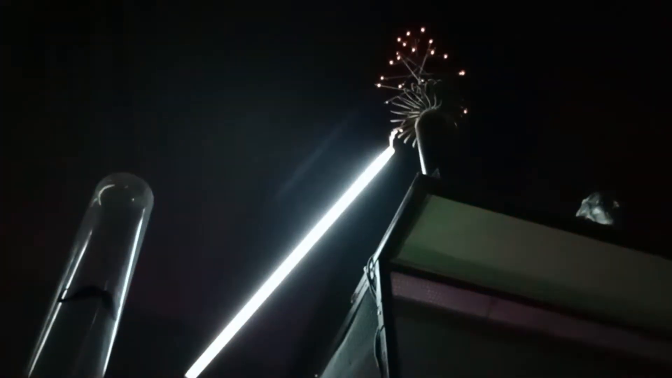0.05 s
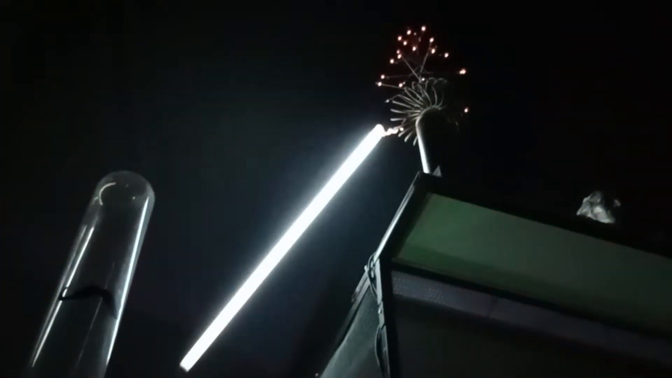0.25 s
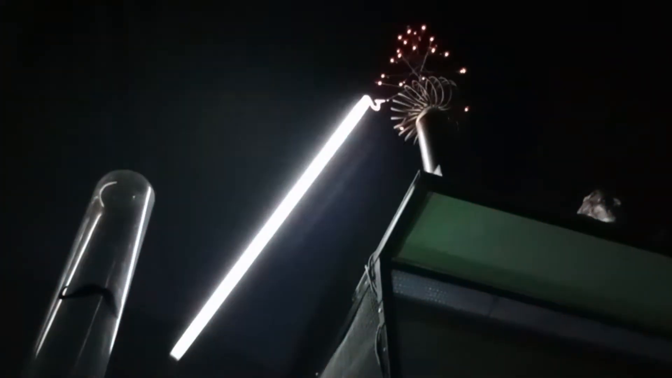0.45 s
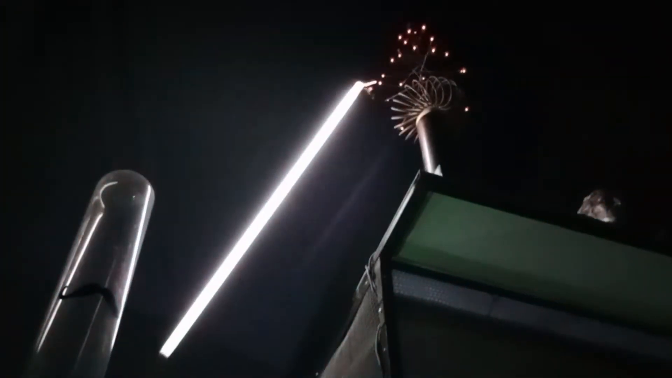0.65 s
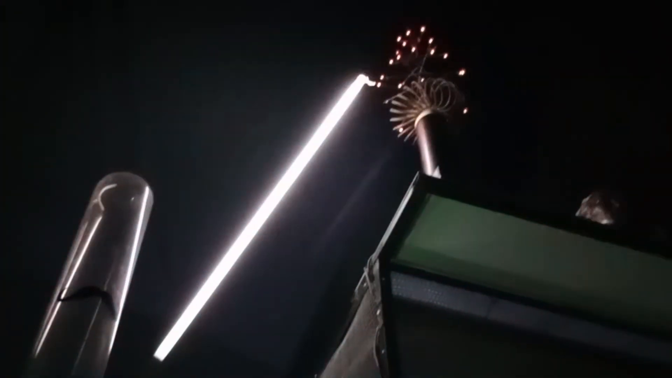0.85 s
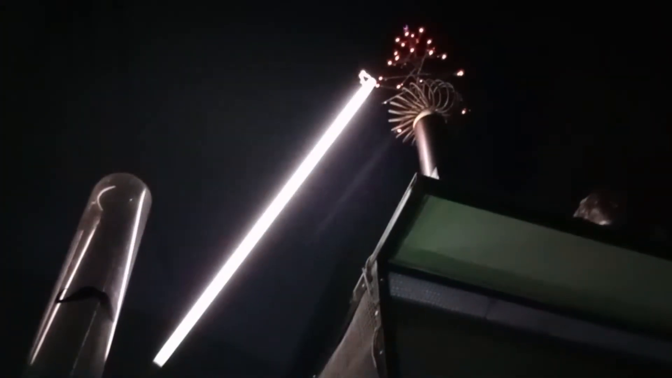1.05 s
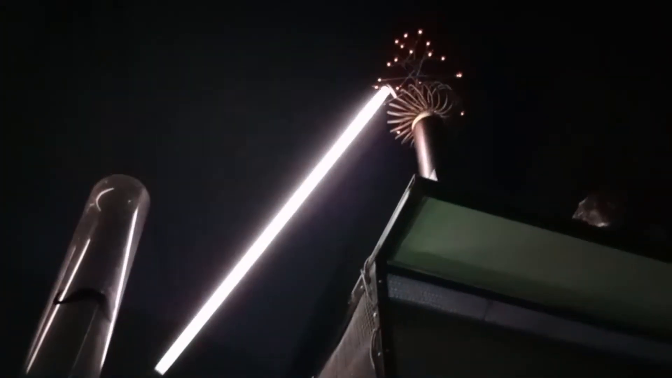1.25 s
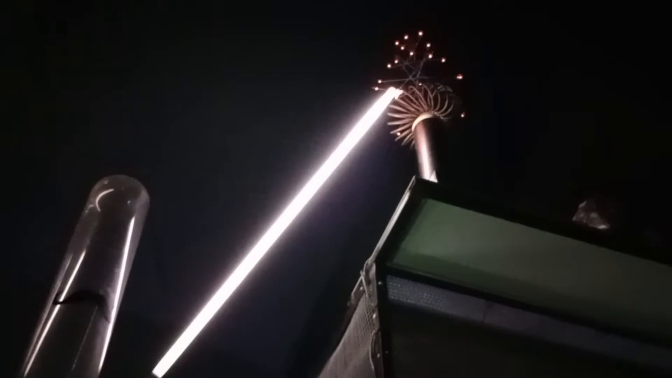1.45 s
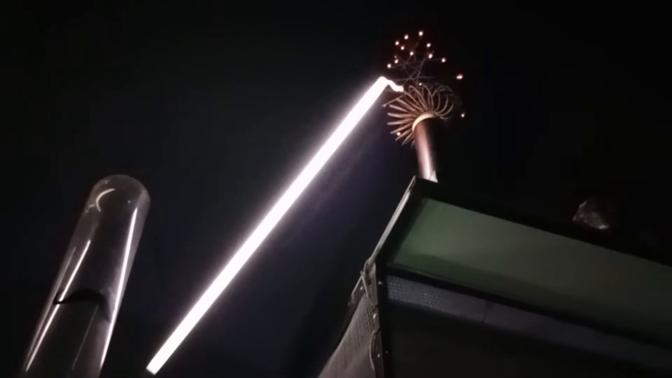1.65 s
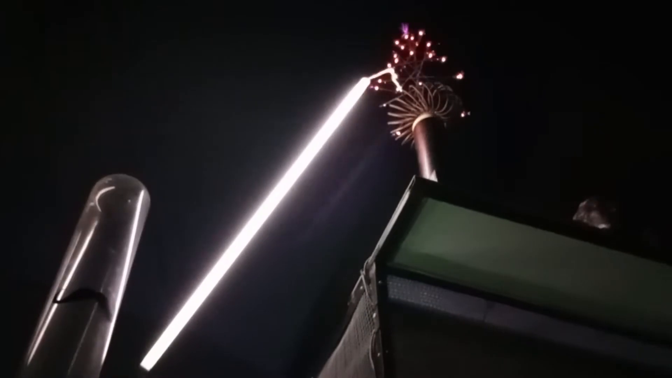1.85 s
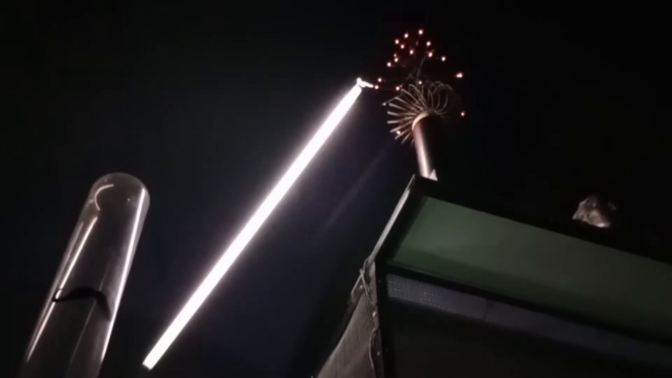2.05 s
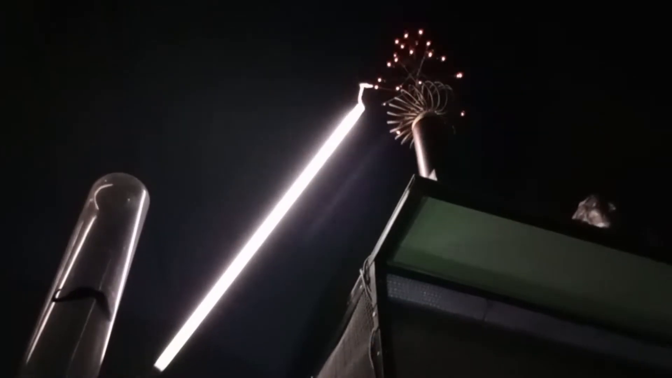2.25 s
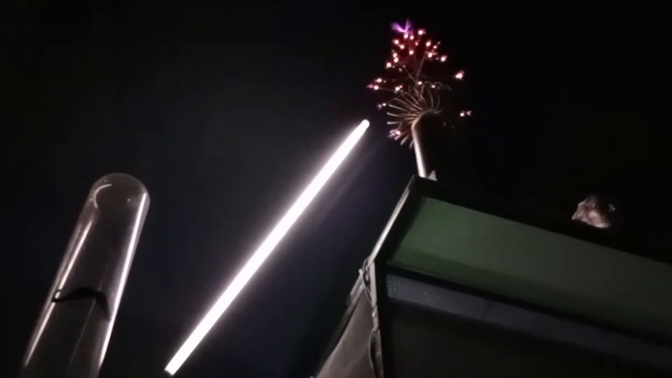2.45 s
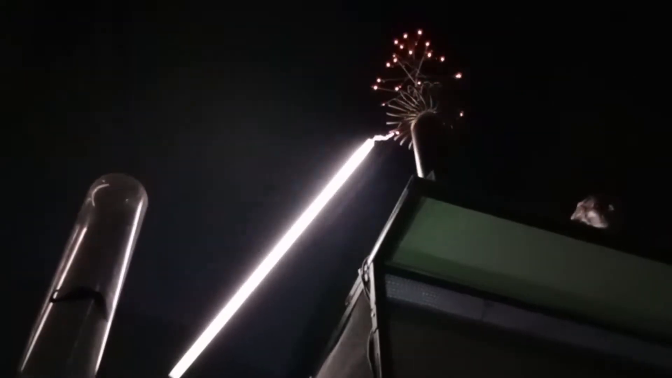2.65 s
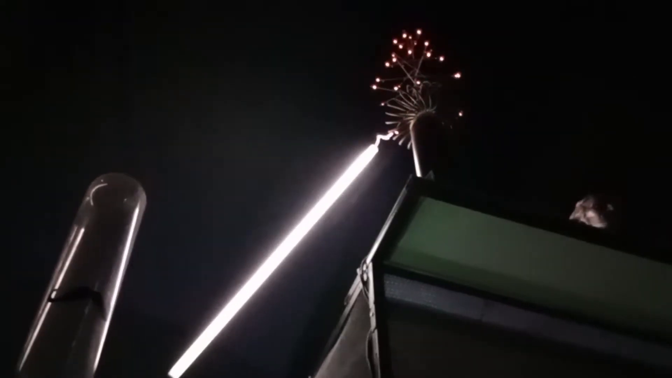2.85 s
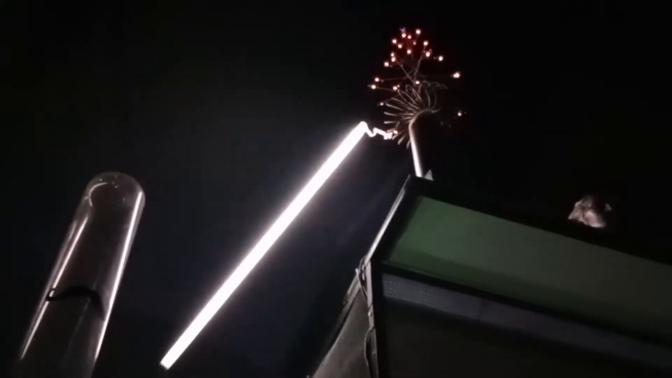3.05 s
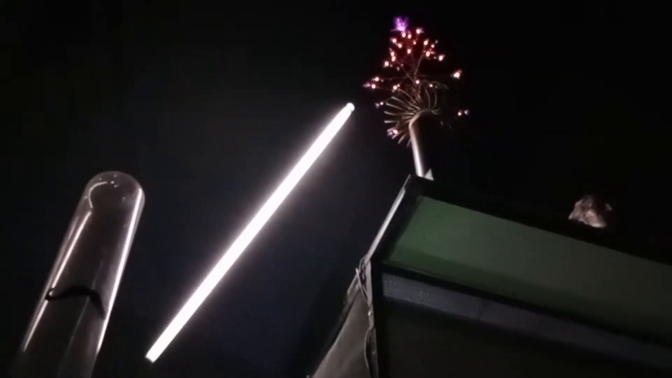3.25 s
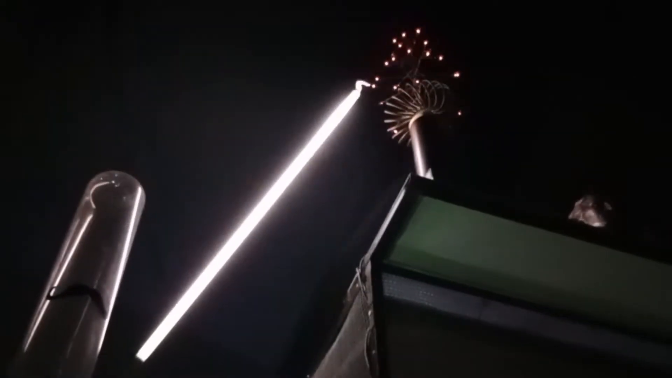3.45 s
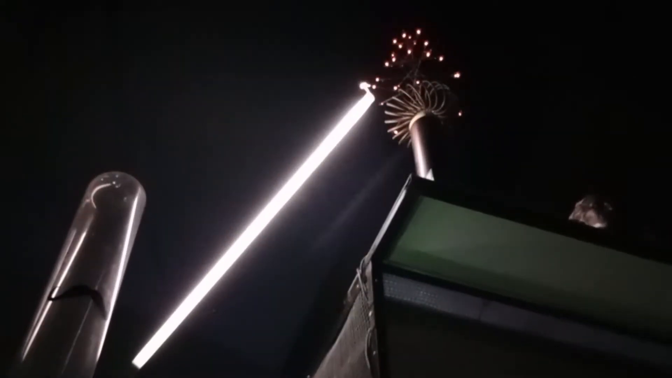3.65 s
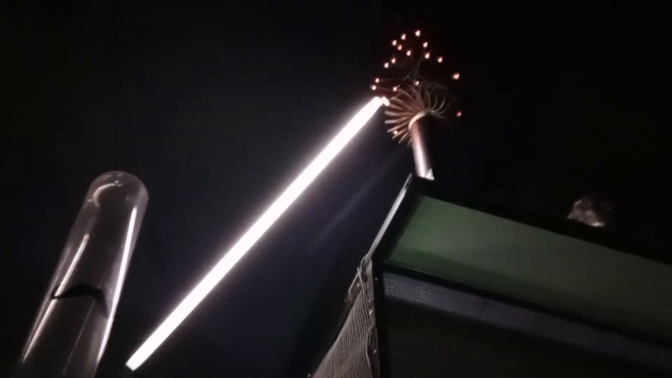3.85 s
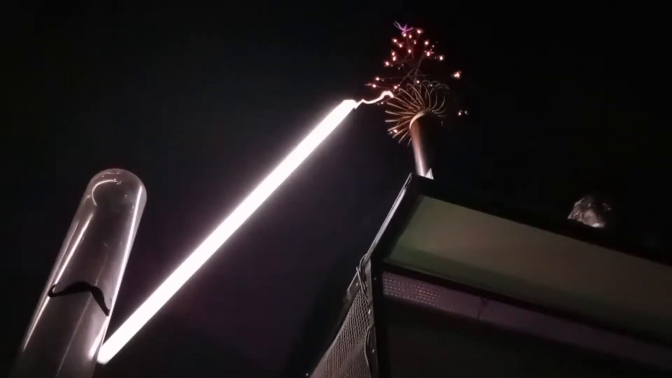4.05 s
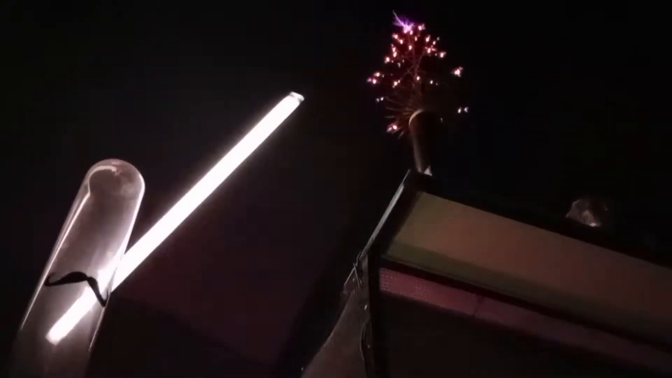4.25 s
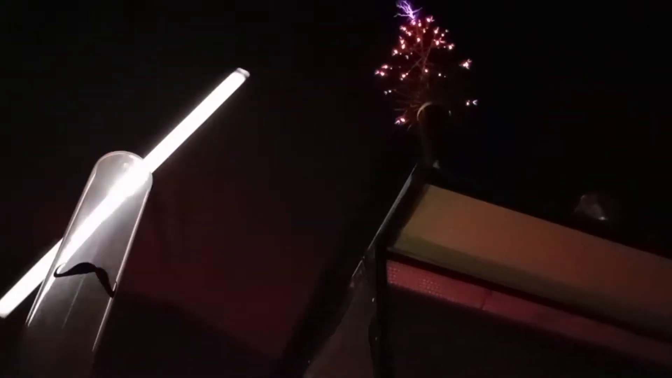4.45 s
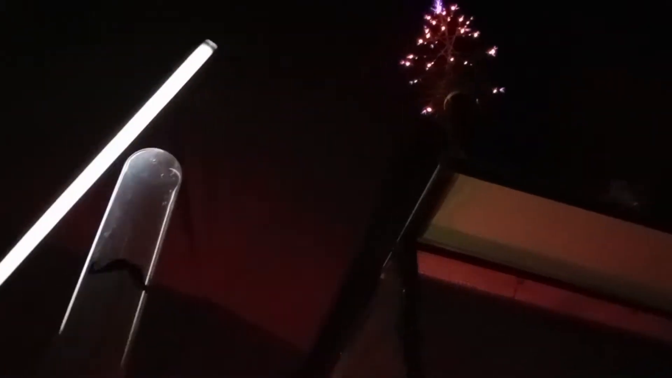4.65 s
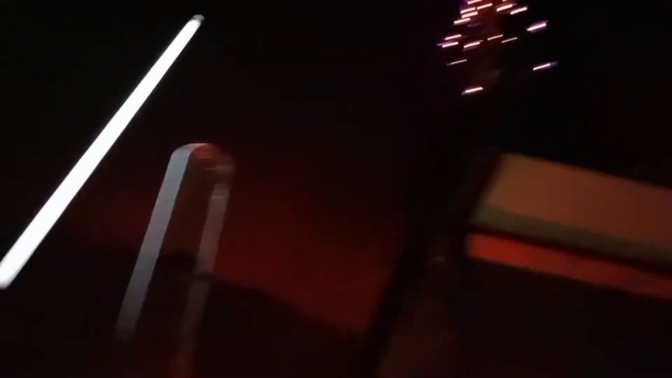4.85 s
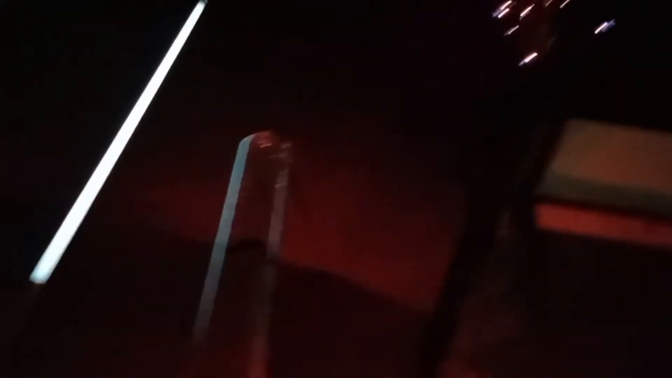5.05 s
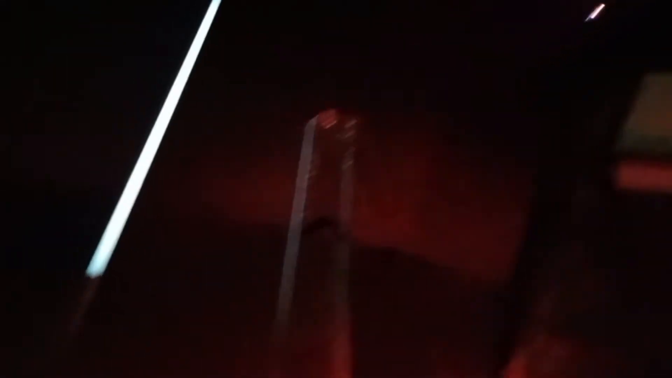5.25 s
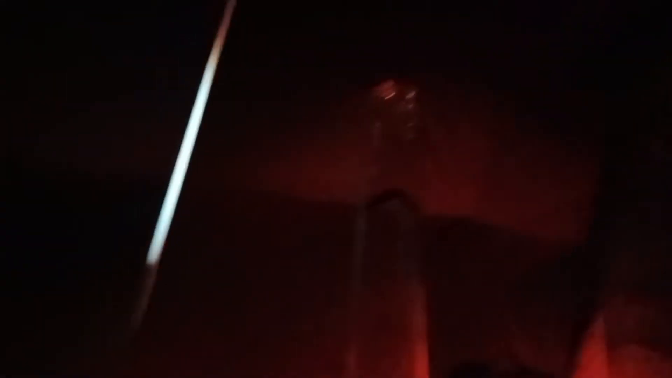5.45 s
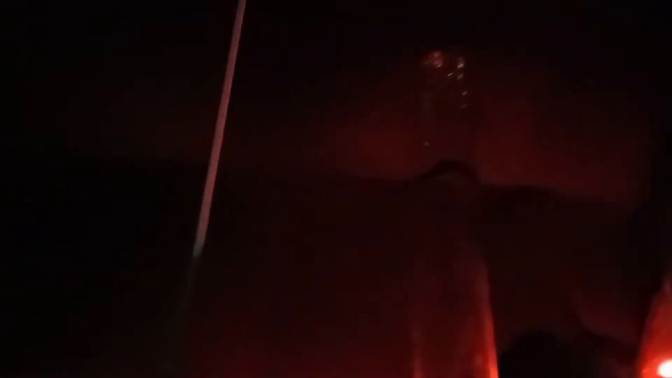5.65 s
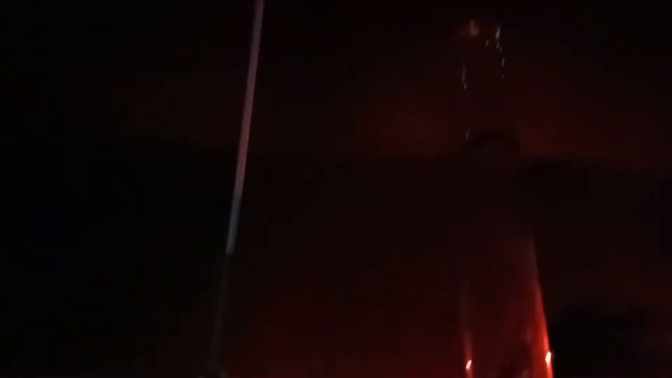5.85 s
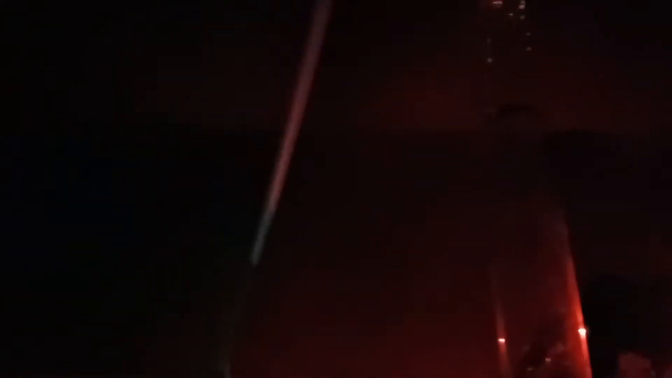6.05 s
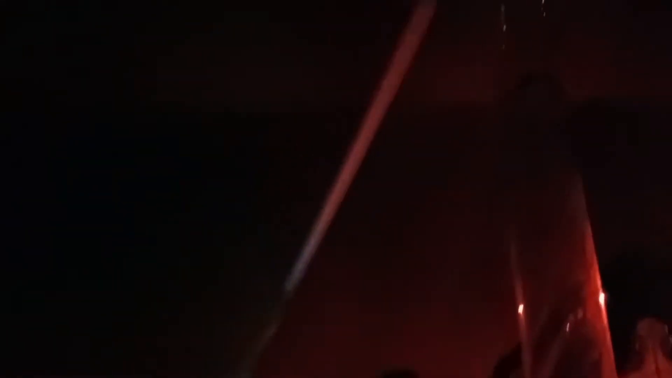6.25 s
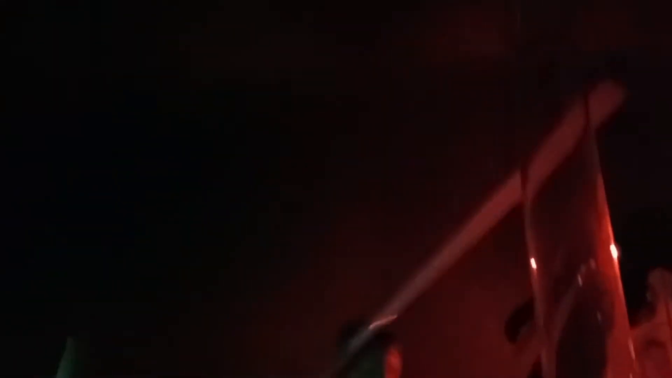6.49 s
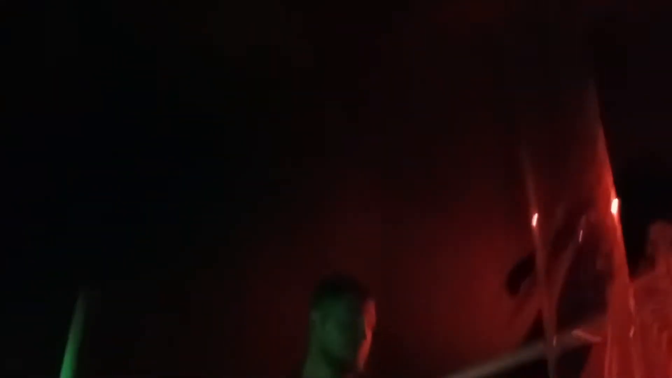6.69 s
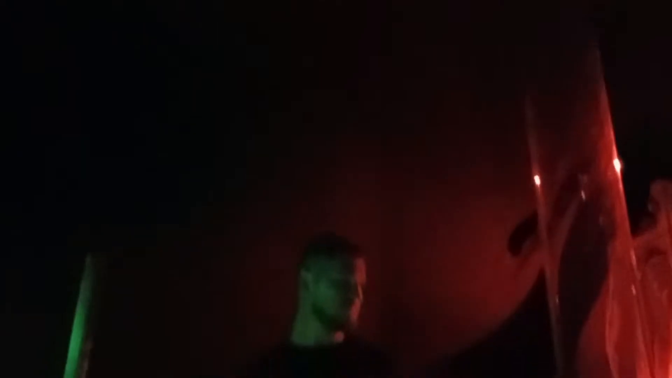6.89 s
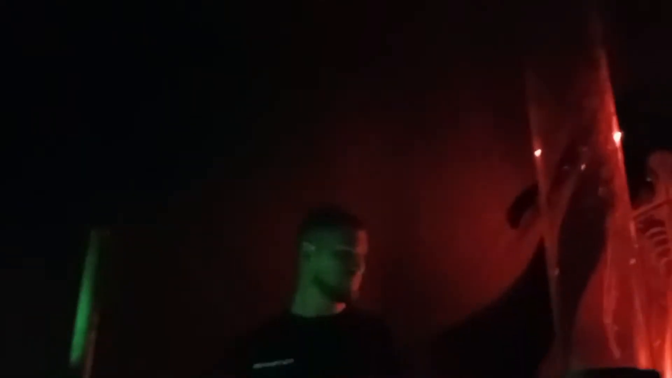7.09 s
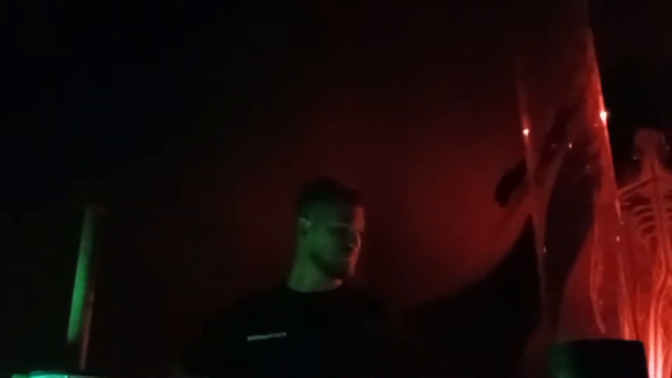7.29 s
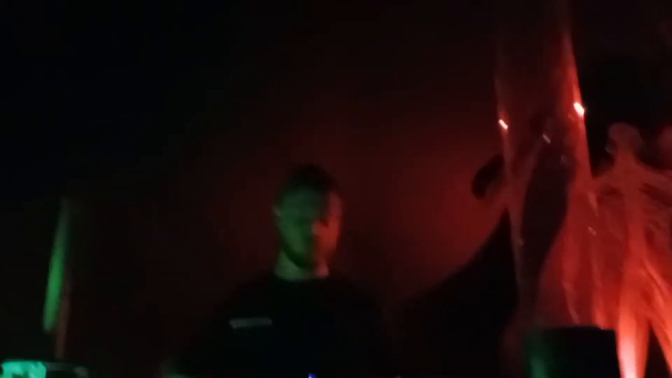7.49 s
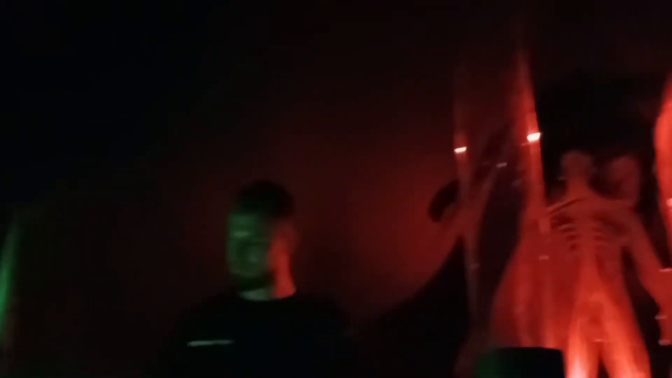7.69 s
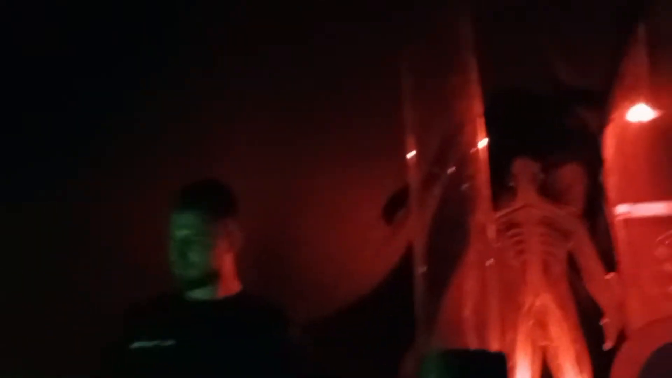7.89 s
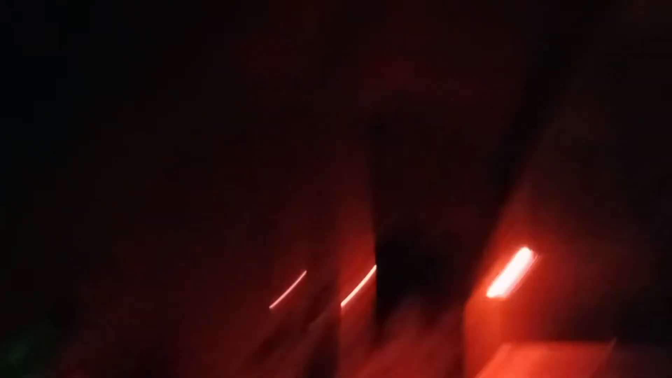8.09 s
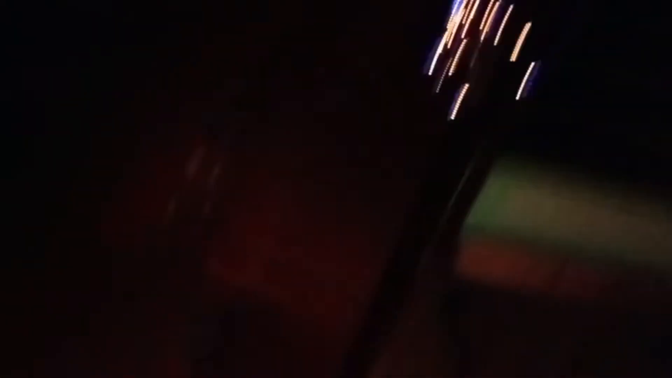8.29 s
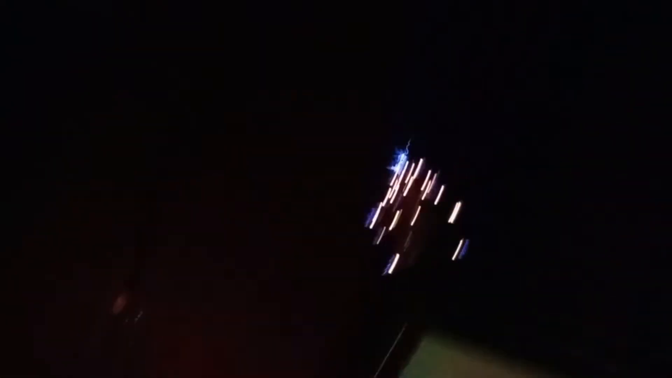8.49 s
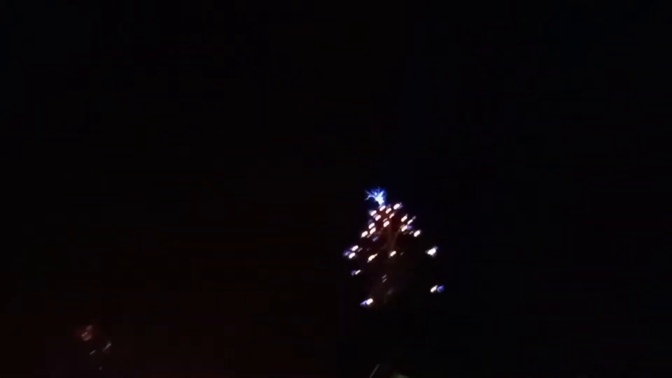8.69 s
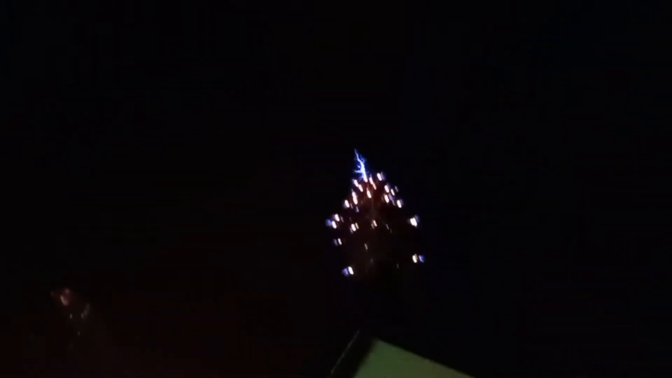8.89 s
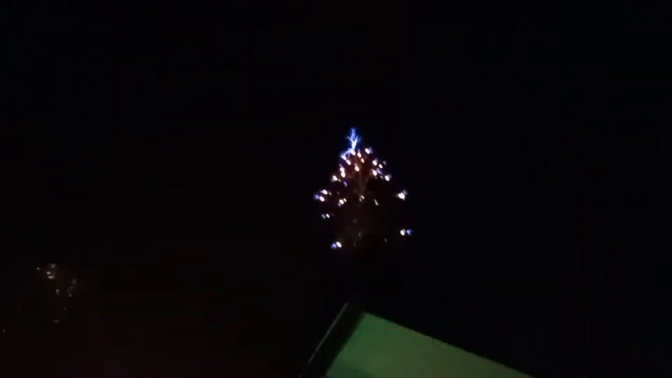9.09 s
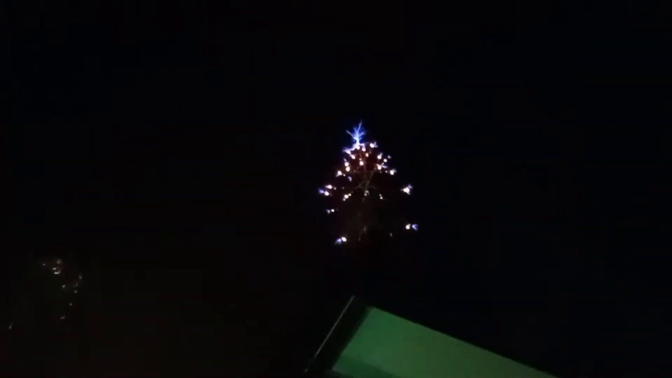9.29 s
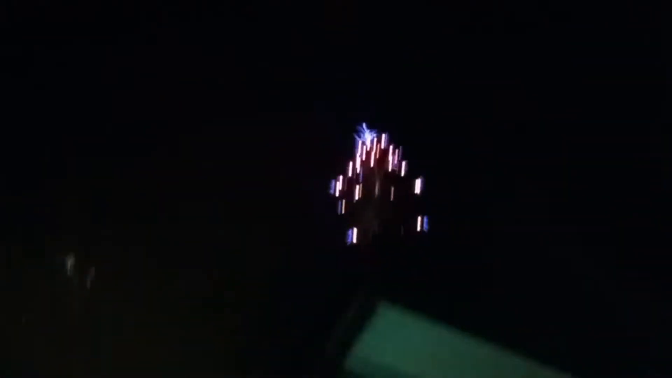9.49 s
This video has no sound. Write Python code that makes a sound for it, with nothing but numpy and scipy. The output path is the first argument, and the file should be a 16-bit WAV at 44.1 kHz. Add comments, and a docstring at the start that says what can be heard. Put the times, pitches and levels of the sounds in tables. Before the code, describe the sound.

A high-voltage coil buzzes loudly and continuously at one fixed pitch, harsh and metallic, its tone flickering as sparks jump between sharp arc and fizzing corona.

```python
"""In a hall, an interrupted high-voltage coil fires a spark about 472 times a second, close to a hand-held microphone.
The discharge jumps between a sharp arc to a glowing tube and a fizzing corona on the coil's tip. Summed overtones
make the buzz, pulsed noise the fizz; echoes from three near surfaces lift and sink the low overtones as spark and
listener move. Handling adds low rumble, brief hums and two knocks."""
import sys
import numpy as np
from scipy import signal
from scipy.fft import rfft, irfft, next_fast_len
from scipy.io import wavfile

SR = 44100
rng = np.random.default_rng(int(sys.argv[2]) if len(sys.argv) > 2 else 0)


def to_wav(s):
    """Save 16-bit WAV."""
    ch = np.atleast_2d(s).T  # columns
    pcm = np.round(np.clip(ch, -1, 1) * 32767)  # PCM
    wavfile.write(sys.argv[1], SR, pcm.astype(np.int16))


N = 420273
STEP = 32   # samples between two control values
SPARK_HZ = 471.93
SOUND_CM_PER_S = 34300

# Where the discharge lands. Each row: start in seconds, how far it jumps (0-1), 1 for an arc on the tube or 0 for
# corona, buzz in dB, growth in dB per s, crackle in dB, fizz in dB, then the extra path of three echoes in cm,
# counted within one wavelength of the spark rate.
JUMPS = [(0.0, 0.9, 1.0, -1, -12, -15, -39, 20.7, 11, 43.6),
         (0.042, 0.38, 1.0, -5.5, 63, -13, -45.5, 51, 13.7, 44.3),
         (0.22, 0.38, 1.0, 0.6, 16, -14, -47, 58.1, 51.3, 29),
         (0.44, 0.81, 1.0, 5.6, 5, -17, -34, 17.5, 67.4, 70.7),
         (0.678, 0.74, 1.0, -1.1, 41, -18.5, -39.8, 12.2, 52, 62.5),
         (0.79, 0.27, 1.0, 0.4, 47, -15.5, -44, 47.4, 19.6, 24),
         (0.89, 0.29, 1.0, 1.7, 24.8, -13.5, -43, 61.4, 17.6, 12),
         (1.02, 0.33, 1.0, 4.5, -8, -14.5, -37.4, 14.6, 66.5, 53),
         (1.234, 1.0, 1.0, -3, 14.7, -18, -41.1, 54, 24.4, 5.6),
         (1.44, 0.32, 1.0, -5.5, 43, -14, -47, 50, 34.6, 66.5),
         (1.61, 0.29, 1.0, -3, 41, -14.5, -45, 31, 51, 53.5),
         (1.888, 0.55, 0.0, -0.2, 13, -19.5, -34.0, 39, 63, 53),
         (2.022, 0.96, 1.0, -3.5, 27.5, -17, -38, 65, 54.3, 16),
         (2.15, 0.27, 1.0, -2.7, 68, -15, -46, 18.8, 44, 46.5),
         (2.25, 0.3, 1.0, -0.2, 0.2, -18, -41, 55, 1.75, 12.2),
         (2.417, 0.74, 0.0, -7.5, 60, -20.5, -33, 62.9, 28.8, 18.5),
         (2.615, 0.51, 0.0, -1.7, 11, -15.5, -27.9, 27.2, 68, 8.8),
         (2.65, 0.97, 1.0, -0.4, 16, -15.5, -37, 48, 12.8, 41),
         (2.837, 0.48, 1.0, 0, 44, -13, -46, 59, 23.5, 27.3),
         (2.99, 0.299, 1.0, 2.5, -19.5, -19, -35, 72.7, 22, 27),
         (3.045, 0.89, 1.0, -2, 108, -16, -35.7, 63, 22, 32),
         (3.11, 0.38, 0.0, 0, 18.5, -19, -36.5, 32, 25.7, 59.5),
         (3.25, 0.3, 0.0, 2, -6, -16, -30, 67, 27.3, 13),
         (3.427, 0.9, 1.0, -2, 77.8, -18.5, -34, 54.8, 39.0, 37),
         (3.53, 0.3, 1.0, -2, 61.5, -17, -43, 43.7, 17.1, 25.7),
         (3.62, 0.31, 1.0, -0.8, 37, -18.5, -48, 29.4, 66.4, 39.7),
         (3.785, 0.95, 1.0, -2.5, 30, -21.2, -37, 15, 47.5, 71.6),
         (3.94, 0.3, 1.0, 1.5, -12, -15.5, -41.1, 18.8, 50.6, 60),
         (4.111, 0.64, 0.0, -3, 13, -33.5, -36.4, 47, 4.1, 60.6)]
# The listener turns away and back once the corona stays on the tip; changes added to the current jump, the first
# row also holding before its time. Each row: time in seconds, buzz in dB, 8th-11th overtones in dB, crackle in dB,
# air in dB, fizz in dB, then the extra path of the three echoes in cm.
TURN = [(4.12, 0.0, -1, -6.5, 2, -3, 0.0, -0.5, 2), (4.3, 5, 2.5, 10, -1, 6, -0.2, 0.3, -1.4),
        (4.66, 5.0, -4, 8, 0.4, 4, 3.5, 1.0, 0.4), (5.1, 4.3, -0.5, 4, 4, 5.8, -0.8, -2.5, 0.5),
        (5.5, 6.5, 2.4, 8.3, 5, 8, 1.5, 5.5, -6), (5.8, 6, 3, 8.5, 0.2, 5.5, 14, 8, -3.5),
        (6.06, 5, 3.5, 7, 6, 10, 10.5, 6.5, -5), (6.34, 4, 5, 8, 2.9, 5, 13.5, 6.5, -4.5),
        (6.56, 1.1, -1, 7, 2.5, 10.5, 19, 8.5, -6), (6.8, 3.5, -2.5, 7, -0.9, 4, 27, 10.5, -20.5),
        (7.1, 3, -1, 12, 4, 3, 25, 14, -14.5), (7.34, 4.5, 2, 12.5, 6, 9, 17.5, 16.5, -16),
        (7.54, 3, -4, 15, 1.9, 0, 14, 11.5, -14.5), (7.74, 2, 0.5, 12, 2.0, 6, 16, 11, -21.5),
        (7.92, -0.4, -1, 13, 2, 8, 13, 8, -23), (8.1, 3.5, -1, 10.5, -2, 5, 0.3, 9, -11),
        (8.3, 4.4, -5, 7.5, -4, -2, 1, 9.5, -0.3), (8.6, 5.5, -7, 9.5, -2.5, 5.5, -0.5, 10.0, 0.6),
        (9.0, 6.7, -0.5, 12, -6, 3.2, 0, 12, 0), (9.3, 6, 2.5, 7.3, -0.7, -2, -1, 10.7, 1.2),
        (9.52, 6, 4, 11.5, -8, 1.3, -1.5, 13, -1.5)]
# Gain of each of the three echoes; the third surface returns the wave upside down.
ECHO_GAINS = [0.41, 0.57, -0.48]


def amp(db):
    """dB to gain."""
    return 10 ** (np.asarray(db) / 20)


def rms_one(x):
    """Scale to rms 1."""
    return x / np.sqrt(np.mean(np.abs(x) ** 2) + 1e-20)


def in_time(rows, t):
    """Columns of a table, read at times t."""
    s, *columns = np.transpose(rows)
    return [np.interp(t, s, c) for c in columns]


def coloured(x, spectrum):
    """Filter x by a (Hz, dB) table, interpolated over log frequency; rms 1."""
    size = next_fast_len(len(x))
    hz = np.maximum(np.arange(size // 2 + 1) * SR / size, 1)
    points_hz, points_db = np.transpose(spectrum)
    gain = amp(np.interp(np.log(hz), np.log(points_hz), points_db))
    return rms_one(irfft(rfft(x, size) * gain, size)[:len(x)])


def smooth(x, rate_hz):
    """One-pole low-pass of a control signal, settled on its first value."""
    r = np.exp(-2 * np.pi * rate_hz * STEP / SR)
    return signal.lfilter([1 - r], [1, -r], x, zi=[r * x[0]])[0]


def drift(rate_hz, count):
    """Slow complex chance at the control rate; rms 1."""
    settle = 2000
    x = rng.standard_normal(count + settle) + 1j * rng.standard_normal(count + settle)
    for _ in range(3):
        x = smooth(x, rate_hz)
    return rms_one(x[settle:])


def per_sample(control):
    """Control signal read at every sample."""
    return np.interp(np.arange(N) / STEP, np.arange(len(control)), control)


def spot_at(t):
    """Index of the last jump before each time."""
    return np.searchsorted(np.array(JUMPS)[:, 0], t, side="right").clip(1) - 1


def buzz(group_db, t):
    """The overtones of the spark train, each with its own level, phase and waver."""
    # First overtone of each group; the last entry ends the last group.
    group_starts = [1, 2, 3, 4, 5, 6, 7, 8, 12, 24, 33]
    # Shape within each group, overtones 8 to 32, in dB; only differences within a group count.
    upper_db = [-33, -27, -36, -37, -38, -32, -27, -23, -34, -33, -28, -28, -35, -30, -29, -32, -42, -41,
                -37.0, -38, -41, -48, -43, -41, -43]
    overtone_db = np.r_[np.zeros(7), upper_db]
    crackle_start = group_starts[-3]
    count = len(t)
    when, far, arc = np.transpose(JUMPS)[:3]
    spot = spot_at(t)
    arc_now = arc[spot]
    # each spot has its own travel time
    path = np.cumsum(far ** 3 * rng.uniform(1, 2 * np.pi - 1, len(when)))
    turn = np.exp(2j * np.pi * SPARK_HZ * np.arange(N) / SR)
    ripple = np.sin(2 * np.pi * 100 * t)   # the supply sags twice a mains cycle
    # the channel wriggles, most while it re-forms
    unrest = 0.062 - 0.014 * arc_now + 0.2 * splutter(t)
    # the arc stretches and shrinks
    swell = amp(arc_now * drift(7.4, count).real)
    carrier, out = np.ones(N, complex), np.zeros(N)
    for level_db, first, end in zip(group_db, group_starts, group_starts[1:]):
        share = amp(overtone_db[first - 1:end - 1])
        share = share / np.linalg.norm(share)
        for k, part in zip(range(first, end), share):
            carrier = carrier * turn
            chance = rng.standard_normal(len(when))
            for j in range(1, len(when)):   # a short hop keeps most of the old pattern
                chance[j] = np.sqrt(1 - far[j] ** 2) * chance[j - 1] + far[j] * chance[j]
            # the arc keeps its overtones in step, a sharp crack; the many streamers of the corona scatter them
            scatter = np.where(arc > 0, 0.3 + 1.5 / k, 1.5) * chance
            phase = (k * path + scatter + np.pi / 3)[spot]
            wave = part * amp(level_db) * np.exp(1j * phase)
            direct = smooth(smooth(wave, rate_hz=90), rate_hz=90)
            hall = smooth(wave, rate_hz=13)
            wave = 0.35 * direct + 0.65 * hall
            slow, quick = drift(19.0, count), drift(84.4, count)
            waver = unrest * (1 + 0.45 * k) * (slow + (0.9 - 0.47 * arc_now) * quick)
            if end - first > 1:   # short waves fade in and out as spark and microphone cross their nodes
                wave = wave * amp((3 + 1.55 * arc_now) * drift(4.55, count).real)
            if first == crackle_start:   # the arc cracks higher than the corona
                wave = wave * amp(13.4 * (arc_now - 0.5) * np.log2(k / 17))
            shape = np.sqrt(2) * wave * swell * (1 + 0.05 / np.sqrt(k) * ripple + waver)
            out += per_sample(shape.real) * carrier.real - per_sample(shape.imag) * carrier.imag
    return out


def group_levels(t):
    """Level of each overtone group and of the fizz: direct sound and three echoes add or cancel at the listener."""
    # Direct sound of overtones 1-7, in dB, ahead of the jump and turn levels.
    low_direct_db = [-26, -17.5, -23, -29.5, -20.5, -23.5, -26.3]
    # Level of the air, the 24th-32nd overtones, relative to the crackle in dB: corona, arc.
    air_re_crackle_db = (-15, -13)
    middle_base_db = -27   # 8th-11th overtones together
    growth_s, growth_top_overtone = 0.12, 17   # a fresh channel stretches this long; low overtones change most
    corona_bass_db = 4.5   # the corona has the fuller fundamental
    creep_cm, creep_hz = 1.56, 4.8   # the foot of the arc wanders about its spot
    when, _, arc, buzz_db, growth, crackle_db, fizz_db = np.array(JUMPS)[spot_at(t), :-3].T
    turn_db, middle_db, turn_crackle_db, turn_air_db, turn_fizz_db = in_time(TURN, t)[:-3]
    k, arc = np.arange(1, 8)[:, None], arc.astype(int)
    echoes = 1
    for gain, cm in zip(ECHO_GAINS, echo_paths(t)):
        creep = creep_cm * arc * drift(creep_hz, len(t)).real
        wavelengths = k * SPARK_HZ * (cm + creep) / SOUND_CM_PER_S
        echoes = echoes + gain * np.exp(-2j * np.pi * wavelengths)
    echo_db = 20 * np.log10(np.abs(echoes) + 0.0011)
    growth_share = np.clip(1 - (k - 1) / growth_top_overtone, 0, 1)
    growth_db = growth * np.clip(t - when, 0, growth_s) * growth_share
    low_db = np.array(low_direct_db)[:, None] + buzz_db + turn_db + growth_db + echo_db
    low_db[0] += corona_bass_db * (1 - arc)
    crackle_db = crackle_db + turn_crackle_db
    air_db = crackle_db + turn_air_db + np.array(air_re_crackle_db)[arc]
    return [*low_db, middle_base_db + middle_db, crackle_db, air_db], fizz_db + turn_fizz_db


def echo_paths(t):
    """Extra path of each echo in cm, stepping with the jumps and gliding with the listener's turn."""
    return np.array(JUMPS)[spot_at(t), -3:].T + in_time(TURN, t)[-3:]


def splutter(t):
    """Unrest that flares at each jump and dies within a few hundredths of a second."""
    return sum(far ** 2 * (t > s - 0.004) * np.exp(-np.abs(t - s) / 0.02) for s, far, *_ in JUMPS[1:])


def fizz(fizz_db, crackle_db, t):
    """No two sparks are alike: noise that bursts once a firing, with a splutter at every jump."""
    # Fizz between the low overtones. Each row: frequency in Hz, density in dB per Hz.
    fizz_spectrum = [(200, -29), (400, 5), (720, -8), (1200, -4), (1650, 2), (2600, 4), (3300, 8.5),
                     (4000, -9), (4600, -59)]
    # Sizzle between the high overtones. Each row: frequency in Hz, density in dB per Hz.
    sizzle_spectrum = [(4000, -50), (5100, -27), (6500, 1.5), (9000, 5.5), (11000, -1), (13700, -16),
                       (15300, -11)]
    # Sizzle level relative to the crackle in dB: corona, arc.
    sizzle_re_crackle_db = (-5, -15)
    least_crackle_db = -26   # the sizzle goes on while the crackle drops out
    burst = splutter(t)
    arc = np.array(JUMPS)[spot_at(t), 2].astype(int)
    flicker_db = 2.5 * drift(9.5, len(t)).real
    low = smooth(amp(fizz_db + flicker_db), rate_hz=30) + amp(-31) * burst
    sizzle_db = np.maximum(crackle_db, least_crackle_db) + np.array(sizzle_re_crackle_db)[arc]
    high = smooth(amp(sizzle_db), rate_hz=10) + amp(-36) * burst
    firing_phase = SPARK_HZ * np.arange(N) / SR % 1
    pulse = 0.27 + np.exp(-3.0 * firing_phase)
    low_noise, high_noise = rng.standard_normal((2, N)) * pulse
    low_fizz = per_sample(low) * coloured(low_noise, fizz_spectrum)
    sizzle = per_sample(high) * coloured(high_noise, sizzle_spectrum)
    return with_echoes(low_fizz, t) + sizzle


def with_echoes(x, t):
    """The sound plus its three late copies, delayed by their longer paths."""
    detour_cm = 73.4   # added to every echo path
    n = np.arange(N)
    out = x
    for gain, cm in zip(ECHO_GAINS, echo_paths(t)):
        lag = (cm + detour_cm) / SOUND_CM_PER_S * SR
        out = out + gain * np.interp(n - per_sample(smooth(lag, rate_hz=10)), n, x)
    return out


def handling(count):
    """Lumpy noise rumble on the microphone, brief shaky sine hums and two dying knocks."""
    # Rumble colour. Each row: frequency in Hz, density in dB per Hz.
    rumble_colour = [(20, -39), (50, -5), (90, 2), (150, -5.5), (250, -7.5), (500, -32)]
    # Brief low hums. Each row: centre in seconds, level in dB before the shake, frequency in Hz, half length in s.
    hums = [(1.4, -36, 138, 0.074), (2.287, -36.5, 138, 0.091), (4.845, -37, 101.9, 0.19),
            (5.468, -34, 103.6, 0.11), (7.413, -31.5, 341.8, 0.066), (7.957, -26.5, 90, .17)]
    # Knocks on the case. Each row: start in seconds, level in dB before the soft onset, final pitch in Hz, t60 in s.
    knocks = [(7.125, -10, 118, 0.19), (8.693, -1.5, 89, 0.06)]
    rumble_db = -47.5
    t = np.arange(N) / SR
    level = per_sample(amp(rumble_db + 5.0 * drift(6.7, count).real))
    shaky = 1 + 0.85 * per_sample(drift(33.0, count).real)
    out = np.zeros(N)
    for s, hum_db, hz, half in hums:
        envelope = amp(hum_db) * np.exp(-((t - s) / half) ** 4)
        out += envelope * shaky * np.sin(2 * np.pi * hz * t)
    for s, knock_db, hz, t60 in knocks:
        age = np.maximum(t - s, 0)
        onset = 1 - np.exp(-age / 0.011)
        cycles = hz * age + 1.9 * (1 - np.exp(-age / 0.0057))   # the pitch drops as the contact eases
        out += onset * amp(knock_db - 60 * age / t60) * np.sin(2 * np.pi * cycles)
        level = level + (t > s) * amp(knock_db - 24 - 60 * age / 0.4)   # the case rattles on
    return out + level * coloured(rng.standard_normal(N), rumble_colour)


def scene():
    """Buzz, fizz and handling, mono."""
    t = np.arange(N // STEP + 2) * STEP / SR
    group_db, fizz_db = group_levels(t)
    crackle_db = group_db[-2]
    return (buzz(group_db, t) + fizz(fizz_db, crackle_db, t) + handling(len(t)))[None]


def record(dry):
    """The tallest peaks are clipped; the sound is hollow around 4.8 kHz, a little bright above it, cut at the top."""
    hollow_hz, hollow_width_hz, hollow_depth = 4820, 740, 0.83
    treble_from_hz, treble_lift = 5900, 0.29
    cutoff_hz = 15450
    clipped = np.clip(dry, -0.9, 0.9)
    band = signal.lfilter(*signal.iirpeak(hollow_hz, hollow_hz / hollow_width_hz, fs=SR), clipped)
    treble = signal.lfilter(*signal.butter(1, treble_from_hz, "high", fs=SR), clipped)
    heard = clipped - hollow_depth * band + treble_lift * treble
    top_cut = signal.ellip(12, 0.5, 90, cutoff_hz, fs=SR, output="sos")
    return signal.sosfilt(top_cut, heard)


dry = scene()
out = record(dry)
to_wav(out)
```